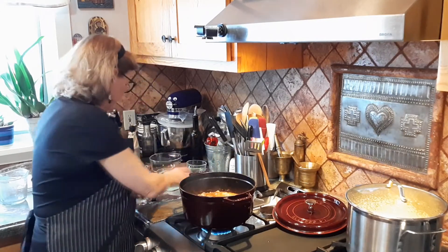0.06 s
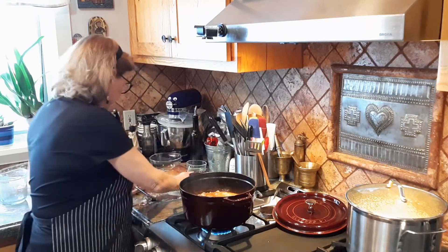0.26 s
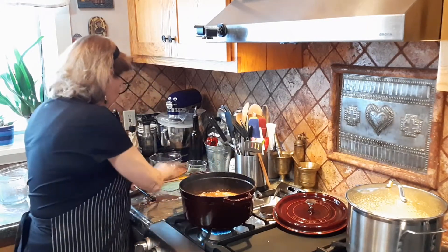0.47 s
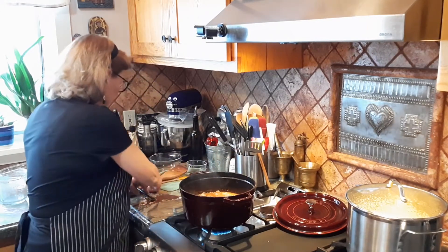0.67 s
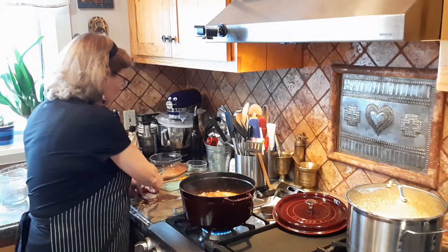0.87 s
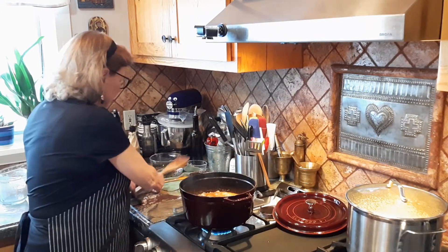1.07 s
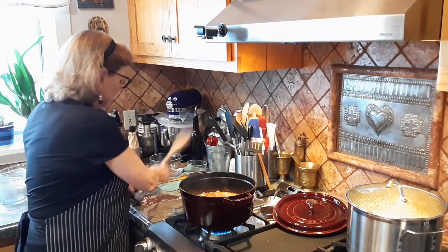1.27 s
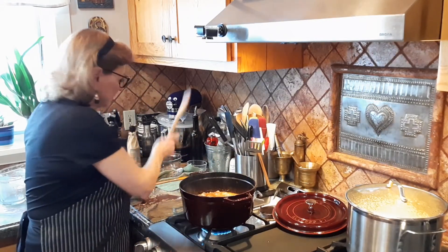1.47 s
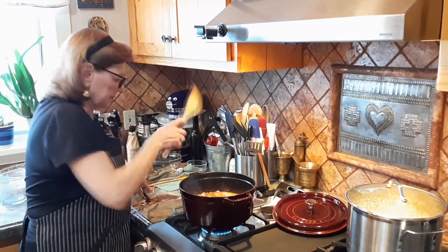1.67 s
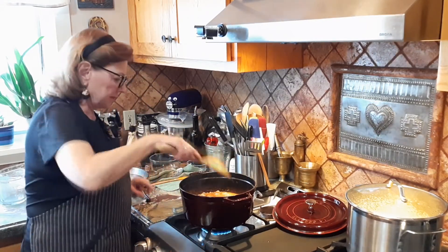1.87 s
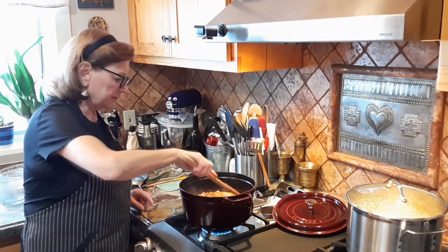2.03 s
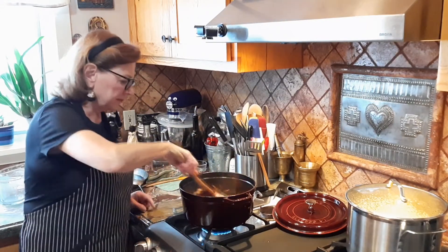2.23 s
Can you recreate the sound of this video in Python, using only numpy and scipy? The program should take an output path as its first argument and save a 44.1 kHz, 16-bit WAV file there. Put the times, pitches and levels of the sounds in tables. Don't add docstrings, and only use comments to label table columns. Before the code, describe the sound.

Wooden spoon clatters down, rasps across the counter in three drags, then taps softly in a full pot

```python
import sys
import numpy as np
from scipy import signal
from scipy.fft import rfft, irfft, next_fast_len
from scipy.io import wavfile
from scipy.ndimage import uniform_filter1d

SR = 44100
rng = np.random.default_rng(int(sys.argv[2]) if len(sys.argv) > 2 else 0)


def dump(signal):
    limited = np.clip(np.atleast_2d(signal).T, -1, 1)
    pcm = np.round(limited * 32767).astype(np.int16)
    wavfile.write(sys.argv[1], SR, pcm)


def boost(x):
    u = np.asarray(x, float) / 20
    return 10 ** u


N = 101429
T = np.arange(N) / SR
F = np.arange(N // 2 + 1) * SR / N + 0.00079

KNOCK_TIMES = [.2025, .205, .2125, .219, .225, .243, .262, .286, .305, .3245, .329, .335, .341, .372]
# level in dB, contact time in ms.
KNOCKS = [(-1, 0.051), (-11.5, 0.1), (-1, 0.079), (-10, 0.087), (-5, 0.06), (-9.5, 0.26), (-17, 0.13),
          (-9, 0.068), (-20, 0.17), (-7, 0.037), (-14.5, 0.062), (-22.5, 0.059), (-14.5, 0.1), (-23, 0.38)]
# pitch in Hz, level in dB, time to fade by 60 dB in seconds.
KNOCK_RINGS = [(170, -2.5, 0.076), (286, -5, 0.067), (589, 1.5, 0.21), (680, -1.5, 0.1), (960, -18, 0.1),
               (1354, -9, .04), (1610, 5.5, 0.0095), (2015, 11.5, 0.18), (2440, -12, 0.068),
               (2730, 3.5, 0.035), (3500, -3.5, 0.018)]
# frequency in Hz, level in dB.
THUD = [(60, -30.5), (150, -25), (650, -11), (1150, -13.5), (2100, -5.5), (4000, -15.5), (5400, -22),
        (7300, -36.5)]
# pitch in Hz, level in dB, time to fade by 60 dB in seconds.
CROCKERY = [(596, -8, 0.1), (1347, -7.5, 0.26), (1834, -12, 0.18), (2002, 3, 0.6), (2361, -10.5, .2),
            (2412, -18, 0.49), (2970, -3, .25), (2847, -16.5, 0.7), (2850, 5, .3), (3370, 3, 0.04),
            (5560, -7.5, 0.18)]

# time in seconds, pressure in dB, speed from 0 to 1,
# contact from 0 (on its tip) to 1 (lying flat).
DRAGS = [
    [(.672, -80, 0.3, 0.15), (.69, -45.5, .3, 0), (.704, -49, 0.68, 0.3), (.75, -40.5, 0.39, 0.97),
     (.77, -38, 1., 0.3), (.81, -42, 0.31, 1), (.835, -57.5, 1, 0.66), (.87, -49, 0.4, 0.46)],
    [(.9715, -36, 0.3, 0.18), (.978, -47.5, 1, 0.69), (1.0, -51.5, 0.8, 0.15), (1.055, -45, 0, 1),
     (1.074, -48, 0.94, 0.19), (1.09, -39, 1, 0.89), (1.096, -32, 0.77, 0.5), (1.115, -68, 0, 0.41),
     (1.14, -81, 1, 1)],
    [(1.275, -65, 0.45, 0.05), (1.31, -47, 0.1, 0.14), (1.33, -43, 0.7, 0.097), (1.45, -41.5, 0.78, 0.35),
     (1.5, -38, 0.82, 0.44), (1.55, -41.5, 0.75, 0.63), (1.64, -43.5, 0.79, 0.6), (1.66, -68, 0, 1.),
     (1.76, -81, 0.9, 0.76)],
]
LEAN_DB = [0, -1, -7]
# pitch in Hz, width in Hz, level in dB.
SPOON_TIP = [(1850, 77, -11), (2090, 78, 2), (2630, 26, -11), (2923, 164, -5), (3550, 100, -27),
             (4950, 380, -6.5), (5630, 80, -7), (6620, 440, -3.5), (7800, 300, -8.5), (10300, 830, -11)]
# pitch in Hz, width in Hz, level in dB.
SPOON_FLAT = [(651, 15, -6.5), (1195, 314, -2.5), (1546, 39, 9), (2210, 30, -11), (4420, 110, -2),
              (4850, 81, -14), (5450, 49, -13), (6900, 55, -28)]
# frequency in Hz, level in dB.
RASP = [(88, -14), (150, -22), (610, -41.5), (786, -16), (1550, 0.5), (2680, -6.5), (6700, -4.5),
        (8640, -12), (15800, -28.5)]
# pitch in Hz, width in Hz, level in dB.
COUNTER = [(173.5, 8.9, -2.5), (294.2, 15.5, -4), (490, 480, -22.5), (784, 250, -8)]
# pitch in Hz, width in Hz, level in dB.
JAR = [(4900, 13, -13), (4560, 25, -4.5)]

STIR_TIMES = [1.871, 1.995, 2.006, 2.04, 2.088, 2.101, 2.108, 2.143, 2.165, 2.198, 2.248, 2.259, 2.274,
              2.283, .6]
# level in dB, length in seconds, brightness in dB.
STIRS = [(-60, 0.008, -42), (-60.5, 0.0059, -13), (-56.5, 0.0056, -43), (-72, 0.018, -23.5),
         (-67, 0.0071, -34.5), (-62, 0.0079, 1.5), (-62.5, 0.0088, -9), (-64.5, 0.0033, 8.5),
         (-88, 0.014, -14), (-74, 0.022, 5.5), (-75, 0.0064, 9), (-72, 0.0064, 10), (-70, .008, 8.5),
         (-68, .006, -7), (-75.5, 0.33, -5)]
# pitch in Hz, width in Hz, level in dB.
POT_LOW = [(535, 53, -4.5), (600, 87, 5.5), (644, 20, -18)]
# pitch in Hz, width in Hz, level in dB.
POT_HIGH = [(1070, 90, 7.5), (1200, 190, 4.5), (1500, 150, -5), (1983, 120, -17.5), (2545, 110, -11.5)]

DROPLET_TIMES = [.0895, .0915, .0905, .96, .968, 1.76, 1.813, 1.822, .2035]
# level in dB, pitch in Hz, width in Hz.
DROPLETS = [(-54.5, 12300, 2500), (-59.5, 17000, 1600), (-66, 1700, 1200), (-59, 11700, 4500),
            (-71, 15000, 15000), (-59.5, 12000, 12000), (-68, 13000, 3500), (-59.5, 13900, 4000),
            (-61, 14000, 5000)]

# pitch in Hz, level in dB.
FRIDGE_HUM = [(60, -63), (49.4, -76), (70.6, -79), (120, -84), (175, -85), (285, -86)]
# time in seconds, level in dB.
FRIDGE_LOAD = [(0, -6), (.2, -3.5), (.5, -4), (.75, 0), (1.2, -1), (1.55, -1.5), (1.75, -0.5), (1.9, -5),
               (2.3, -2.5)]
# frequency in Hz, level in dB.
AIR = [(44, -32), (130, -12), (374, -19.5), (442, -34), (574, -15.5), (950, -30), (3450, -33),
       (5000, -27.5), (6500, -34), (8450, -75), (14300, -120)]
# frequency in Hz, level in dB.
FLAME = [(6500, -4), (7300, -4.5), (8000, -7), (9600, -17), (10500, -6), (12200, -3), (14500, -4.5),
         (15800, -1)]
# time in seconds, level in dB.
FLAME_GUSTS = [(0, -1), (.18, -0.5), (.55, 1), (.66, 1), (0.951, 14), (1.268, 5.5), (1.798, 5.5),
               (1.88, -4.5), (1.985, -5.5), (2.0, 3), (2.05, -3), (2.1, -2), (2.16, 3), (2.22, -4.5),
               (2.3, 8)]

# frequency in Hz, time to fade by 60 dB in seconds.
ROOM_FADE = [(100, 0.34), (400, 0.34), (1500, 0.32), (5000, 0.3), (14000, 0.19)]
# frequency in Hz, likeness from 0 to 1.
ALIKE = [(60, .97), (250, .85), (600, .7), (1500, .15), (15000, .05)]


def knocks():
    rattle_db, rattle_s = -26, 0.0036
    ring_db, crockery_db = -5, -18
    top_hz, air_db = 7200, -11
    push, loose = np.zeros((2, N))
    for s, (db, ms) in zip(KNOCK_TIMES, KNOCKS):
        push += boost(db) * np.exp(-((T - s) * 2000 / ms) ** 2) / (ms * SR / 1128)
        loose += boost(db) * (T > s) * np.exp(-np.abs(T - s) / rattle_s)
    once = np.eye(1, N)[0]
    ring = peaks(once, [(hz, 3.3 / t60, db) for hz, db, t60 in KNOCK_RINGS])
    china = peaks(once, [(hz, 3.9 / t60, db) for hz, db, t60 in CROCKERY])
    thud = unit(colour(once, THUD))
    body = (boost(ring_db) * unit(ring) + thud + boost(crockery_db) * unit(china)) / np.sqrt(N)
    dull = boost(air_db) + (1 - boost(air_db)) / (1 + (F / top_hz) ** 12)
    blows = push + boost(rattle_db) * loose * grit()
    return irfft(rfft(blows) * rfft(body) * dull, N)


def drags():
    judder_db, judder_hz = 1.2, 41.5
    tilt_hz, speed_tilt_db = 5400, 39.5
    jar_db, rasp_db, counter_db = -10.5, 2.5, -3
    force, speed, flat, lean = np.zeros((4, N))
    for rows, lean_db in zip(DRAGS, LEAN_DB):
        s, db, fast, contact = np.array(rows).T
        on = (T >= s[0]) & (T < s[-1])
        force += on * boost(np.interp(T, s, db))
        speed += on * np.interp(T, s, fast)
        flat += on * np.clip(np.interp(T, s, contact), 0, 1)
        lean += on * boost(lean_db)

    scrape = grit() * boost(judder_db * walk(judder_hz))
    low = low_part(scrape, tilt_hz)
    scrape = force * (low + (scrape - low) * boost(speed_tilt_db * (speed - 0.84)))

    def sing(resonate, table):
        return resonate(scrape, table) / np.std(resonate(rng.standard_normal(N), table))

    spoon = sing(peaks, SPOON_TIP) * (1 - 0.91 * flat) + sing(peaks, SPOON_FLAT) * flat
    jar = boost(jar_db) * 30 * peaks(scrape * lean ** 2, JAR)
    rasp = boost(rasp_db) * sing(colour, RASP) * 0.54
    counter = boost(counter_db) * sing(peaks, COUNTER) * speed * flat ** 2 * lean
    return spoon * 0.68 + jar + rasp + counter


def grit():
    clicks_per_s, spread_db = 9000, 2
    hit = rng.random(N) < clicks_per_s / SR
    click = hit * rng.standard_normal(N)
    return unit(click * boost(spread_db * np.minimum(rng.exponential(size=N), 3)))


def stirs():
    tap_db, top_hz = 15, 2760
    rub = grit()
    low, high = np.zeros((2, N))
    for s, (db, length, bright) in zip(STIR_TIMES, STIRS):
        tap = boost(tap_db) * (np.arange(N) == int(s * SR))
        touch = tap + rub * (T >= s) * np.exp(-np.abs(T - s) / length)
        low += boost(db) * touch
        high += boost(db + bright) * touch
    low = peaks(peaks(low, POT_LOW), [(620, 340, 0.0038)])
    high = colour(peaks(high, POT_HIGH), [(400, -20), (900, 0), (top_hz, 0), (top_hz * 1.1, -25)])
    return 11.4 * low + 4.33 * high


def droplets():
    burst_ms = .45
    noise = rng.standard_normal(N)
    total = np.zeros(N)
    for s, (db, hz, width) in zip(DROPLET_TIMES, DROPLETS):
        burst = noise * boost(db) * np.exp(-((T - s) * 1000 / burst_ms) ** 2)
        note = [(hz, width, 0)]
        total += peaks(peaks(burst, note), note) * np.sqrt(SR / width)
    return total


def echoes():
    build_s = 0.00047
    noise, tail = pair(), 0
    t60 = curve(ROOM_FADE)
    for hz in 60 * 2 ** np.arange(0, 8.5, .5):
        band = np.clip(1 - np.abs(np.log2(F / hz)) * 2, 0, 1) ** .5
        tail = tail + irfft(noise * band, N) * boost(-60 * T / t60[int(hz * N / SR)])
    spec = rfft(tail * (1 - np.exp(-T / build_s)))
    fine, broad = (uniform_filter1d(np.abs(spec) ** 2, int(hz * N / SR)) for hz in (70, 900))
    tail = irfft(spec * np.sqrt(broad / fine), N) * (T < T[-1] / 2)
    energy = np.mean(np.sum(tail ** 2, axis=1))
    return rfft(tail / np.sqrt(energy), next_fast_len(2 * N))


def kitchen(x, tail, wet_db):
    left_lag_s, direct_db = 8e-5, -12.5
    lag = np.exp(-2j * np.pi * F * np.array([[left_lag_s], [0]]))
    size = next_fast_len(2 * N)
    wet = irfft(rfft(x, size) * tail, size)[:, :N]
    return boost(wet_db) * wet + boost(direct_db) * irfft(rfft(x) * lag, N)


def fridge_hum():
    wander_db, wander_hz = 1., 4.4
    ears = np.array([[.13], [-.13]])
    hum = np.zeros((2, N))
    for hz, db in FRIDGE_HUM:
        level = np.sqrt(2) * boost(db + wander_db * walk(wander_hz))
        hum += level * np.sin(2 * np.pi * (hz * T + rng.random()) + ears)
    return hum


def hiss(table, band, db, flicker_hz):
    flicker_db = .8
    noise = unit(irfft(pair() * boost(curve(table)) * band, N))
    return noise * boost(db + flicker_db * walk(flicker_hz))


def background():
    hum = fridge_hum()
    load = boost(np.interp(T, *np.array(FRIDGE_LOAD).T))
    gust = boost(np.interp(T, *np.array(FLAME_GUSTS).T))
    air = hiss(AIR, F < 6500, db=-71, flicker_hz=4)
    flame = hiss(FLAME, F > 6500, db=-76, flicker_hz=17)
    rumble = low_part(air, 1500)
    return hum * load + boost(3.5) * rumble * load ** 0.82 + (air - rumble) * gust + flame * gust ** 0.72


def curve(table):
    a = np.array(table)
    return np.interp(np.log(F), np.log(a[:, 0]), a[:, 1])


def unit(x):
    return x / np.sqrt(np.mean(x ** 2))


def colour(x, table):
    c = irfft(curve(table) * np.log(10) / 20, N)
    c[1:N // 2] *= 2
    c[N // 2 + 1:] = 0
    return irfft(rfft(x) * np.exp(rfft(c)), N)


def peaks(x, table):
    gain = sum(boost(db) * 1j * F * w / (hz ** 2 - F ** 2 + 1j * F * w) for hz, w, db in table)
    return irfft(rfft(x) * gain, N)


def low_part(x, hz):
    return irfft(rfft(x) / (1 + (F / hz) ** 4), N)


def walk(rate):
    k = int(SR / rate)
    return unit(uniform_filter1d(uniform_filter1d(rng.standard_normal(N), k), k))


def pair():
    alike = np.clip(curve(ALIKE), 0, 1)
    mid, side = rfft(rng.standard_normal((2, N)))
    opposite = np.array([[1], [-1]])
    return (np.sqrt(1 + alike) * mid + np.sqrt(1 - alike) * side * opposite) / np.sqrt(2)


def scene():
    right_db = 2.
    tail = echoes()
    near = kitchen(knocks(), tail, wet_db=-3) * boost(2.0)
    near += kitchen(drags(), tail, wet_db=0.0)
    near += kitchen(stirs(), tail, wet_db=-11) * boost(8.5)
    near += kitchen(droplets(), tail, wet_db=-11.5) * boost(15)
    return (near + background()) * boost(np.array([[-right_db], [right_db]]) / 2)


def low_pass(x):
    return signal.sosfilt(signal.butter(12, 16020, fs=SR, output="sos"), x)


def record(dry):
    notch_hz, notch_wide_hz, notch_depth = 8520, 330, .95
    top_hz = 15950
    notch = 1 - notch_depth / (1 + ((F - notch_hz) / notch_wide_hz) ** 2)
    mix = irfft(rfft(dry) * notch * (F < top_hz), N)
    return low_pass(mix)


dry = scene()
out = record(dry)
dump(out)
```